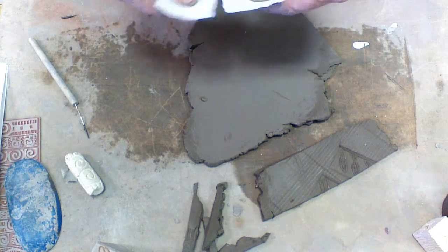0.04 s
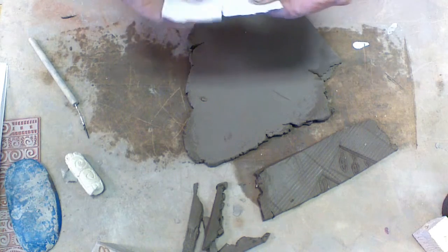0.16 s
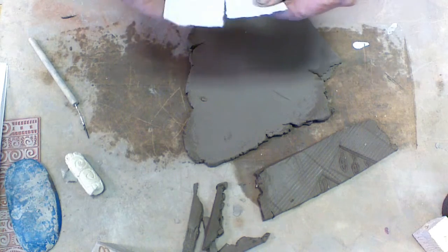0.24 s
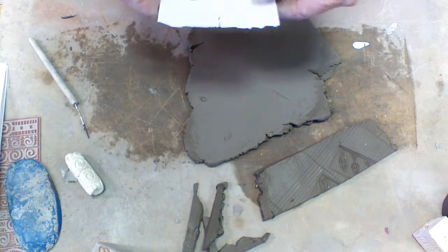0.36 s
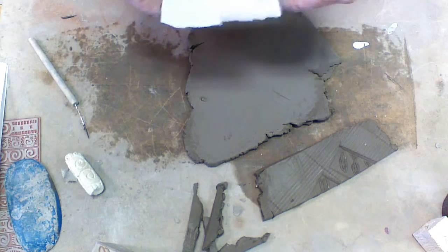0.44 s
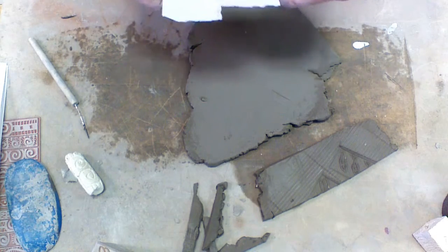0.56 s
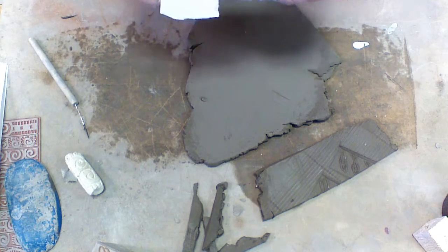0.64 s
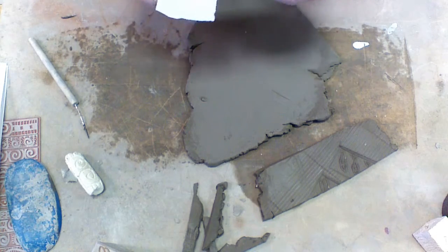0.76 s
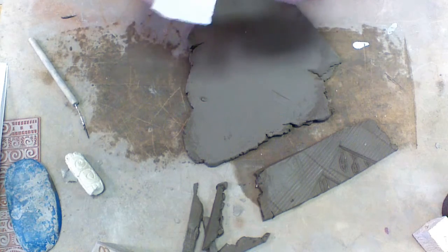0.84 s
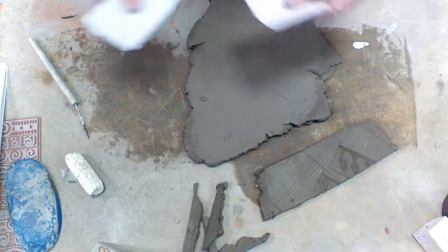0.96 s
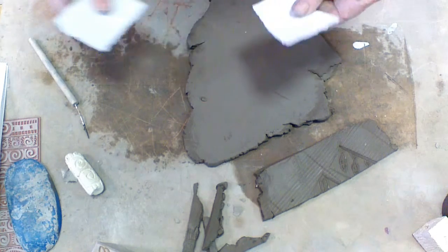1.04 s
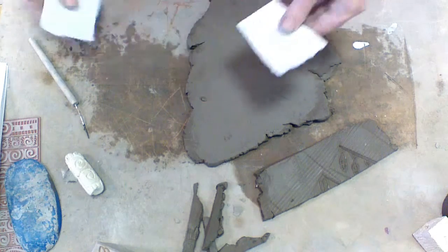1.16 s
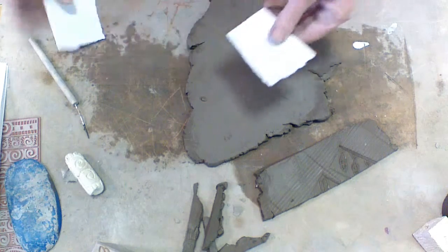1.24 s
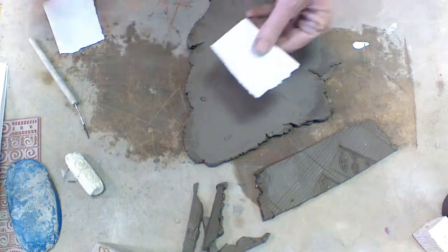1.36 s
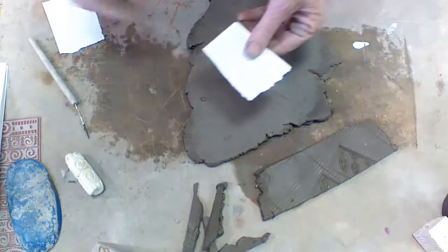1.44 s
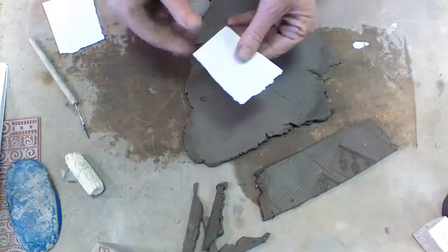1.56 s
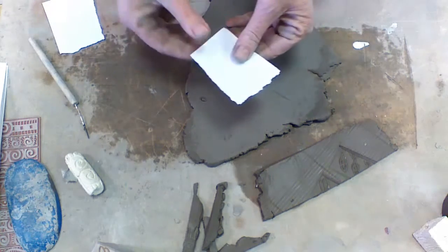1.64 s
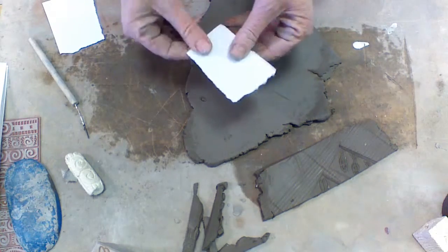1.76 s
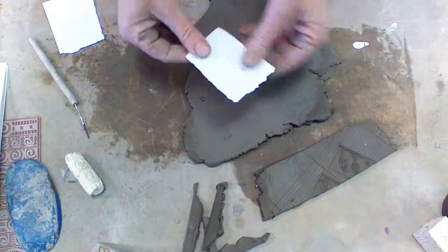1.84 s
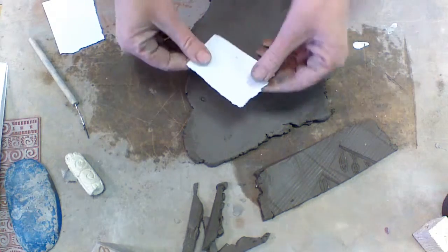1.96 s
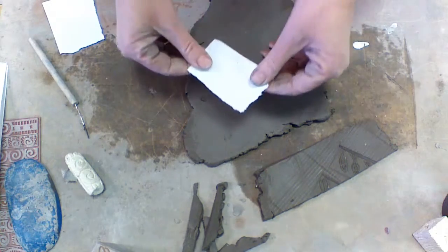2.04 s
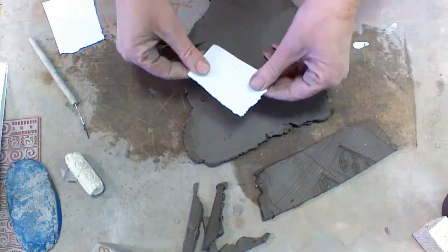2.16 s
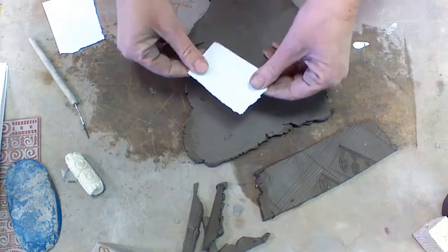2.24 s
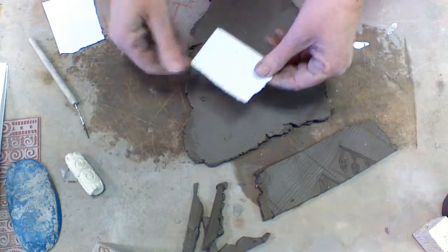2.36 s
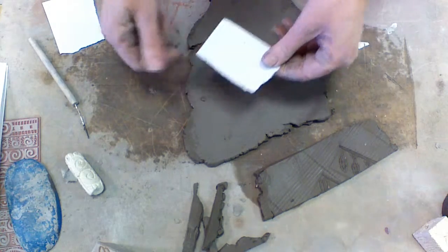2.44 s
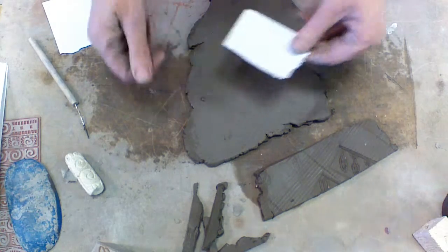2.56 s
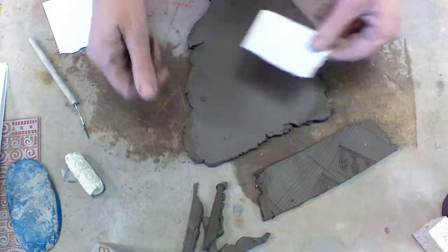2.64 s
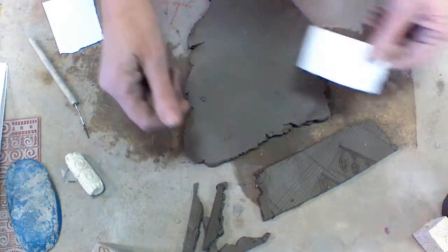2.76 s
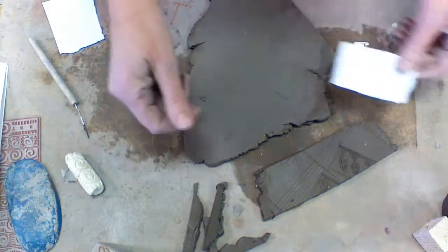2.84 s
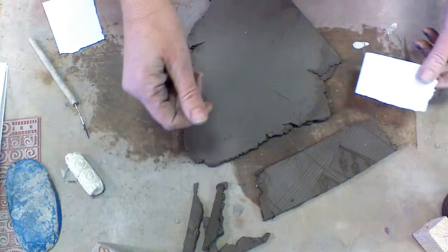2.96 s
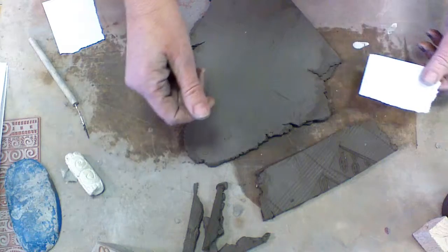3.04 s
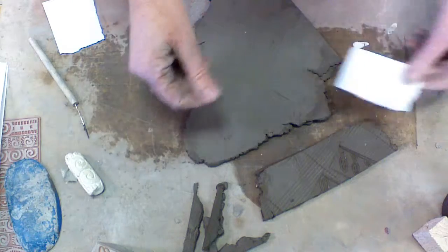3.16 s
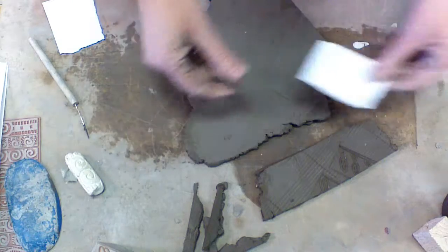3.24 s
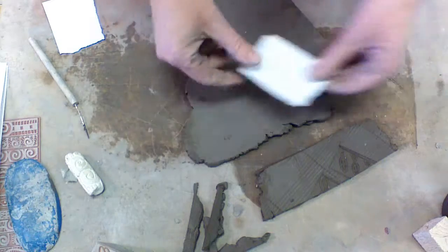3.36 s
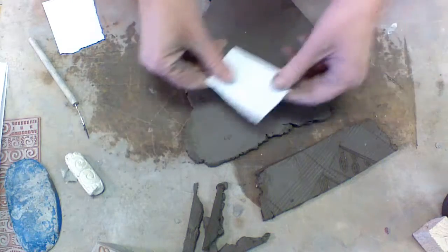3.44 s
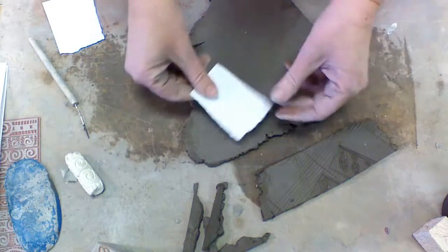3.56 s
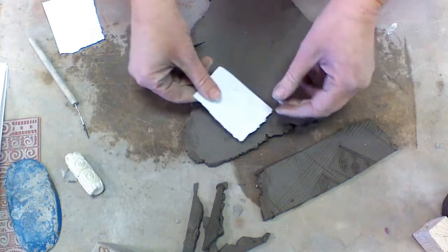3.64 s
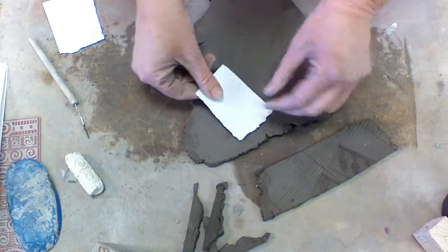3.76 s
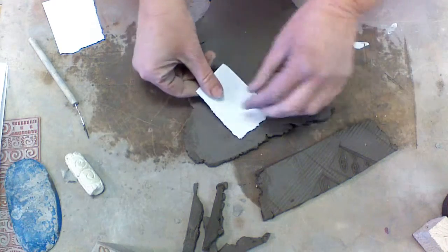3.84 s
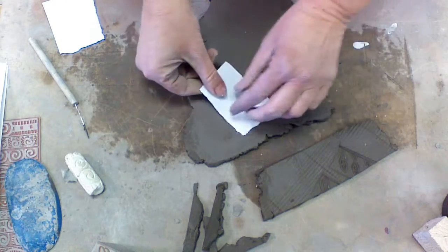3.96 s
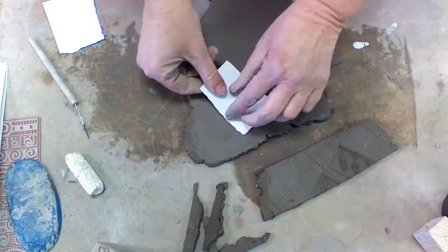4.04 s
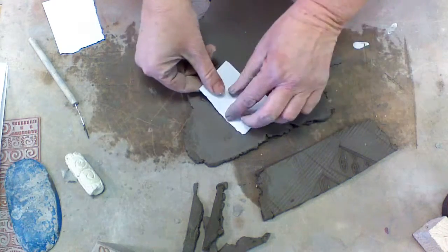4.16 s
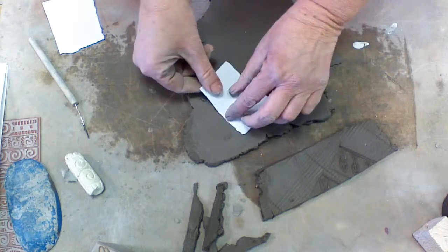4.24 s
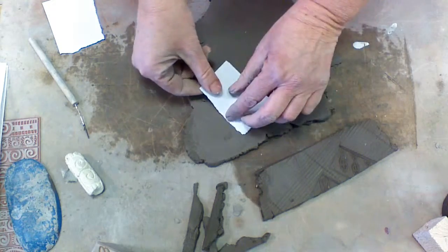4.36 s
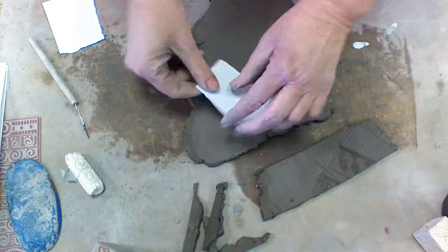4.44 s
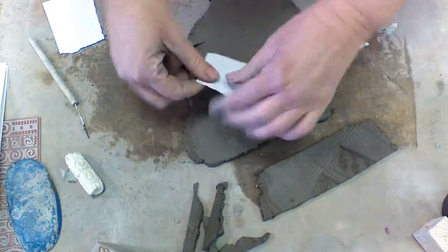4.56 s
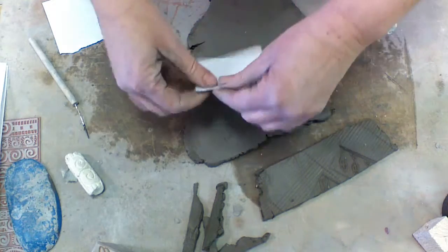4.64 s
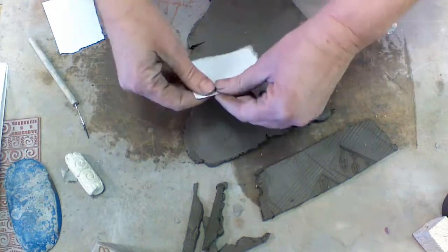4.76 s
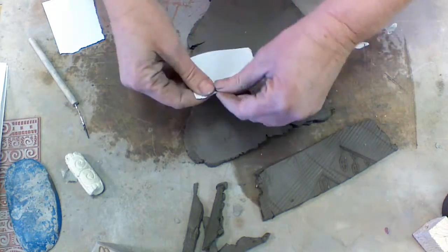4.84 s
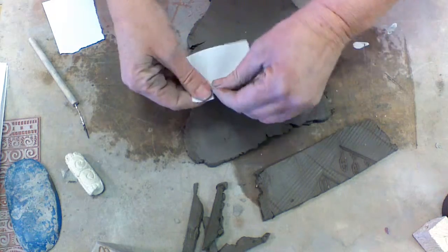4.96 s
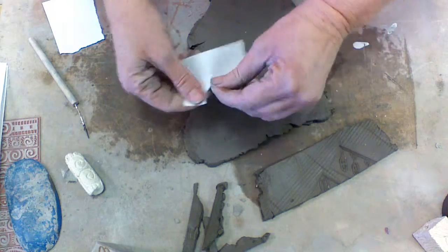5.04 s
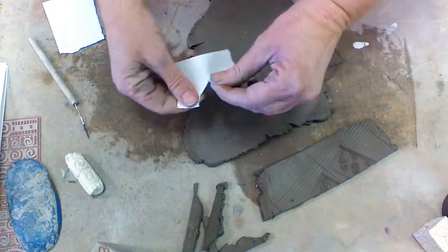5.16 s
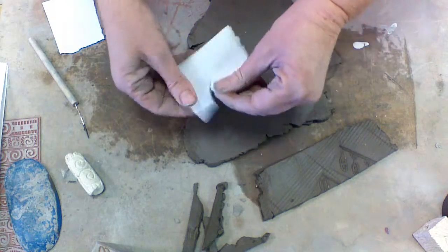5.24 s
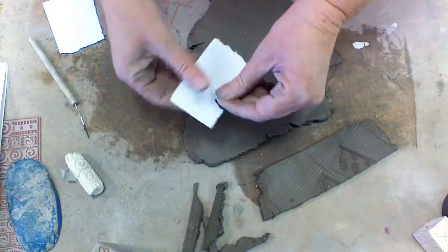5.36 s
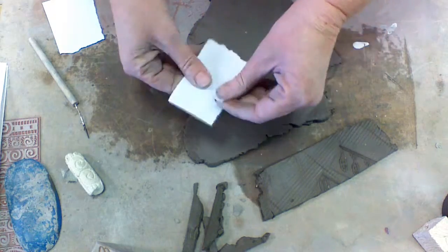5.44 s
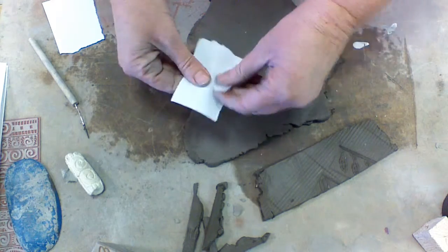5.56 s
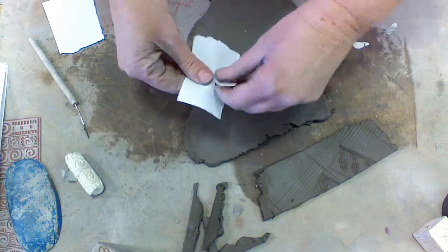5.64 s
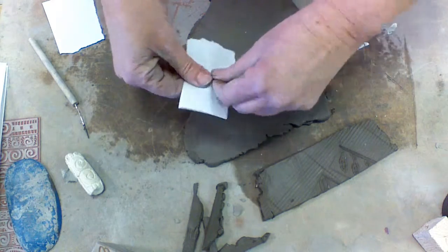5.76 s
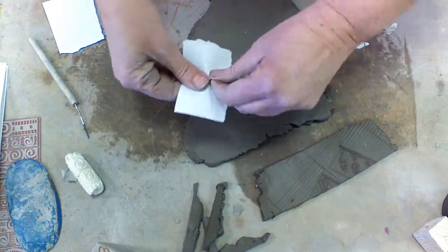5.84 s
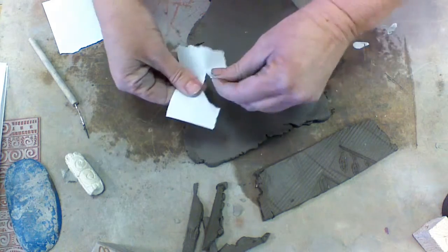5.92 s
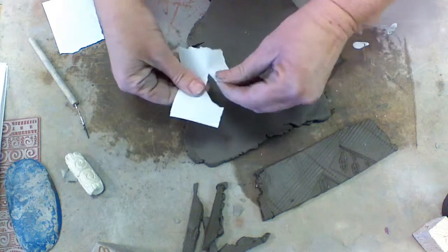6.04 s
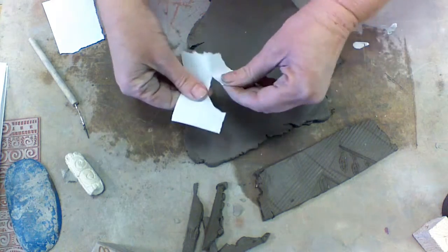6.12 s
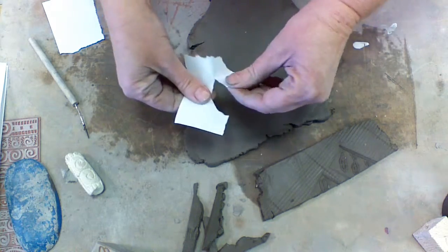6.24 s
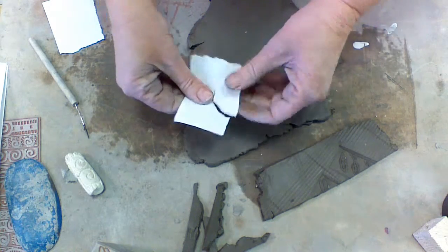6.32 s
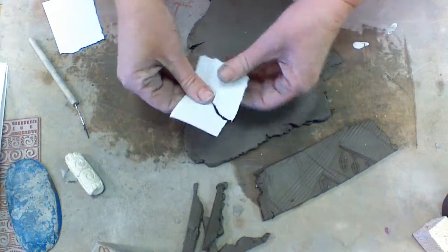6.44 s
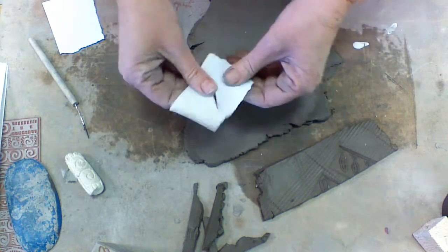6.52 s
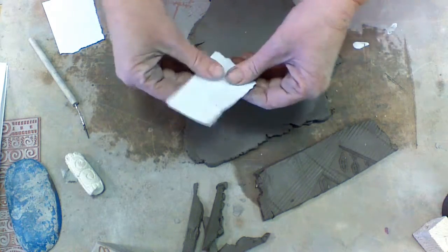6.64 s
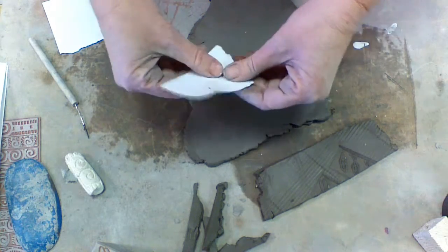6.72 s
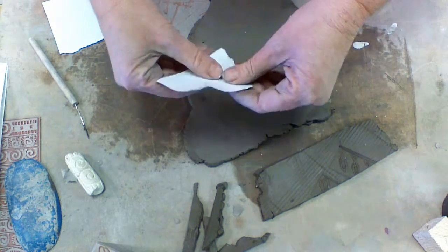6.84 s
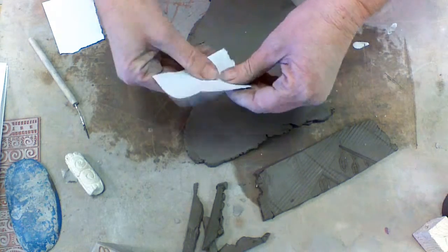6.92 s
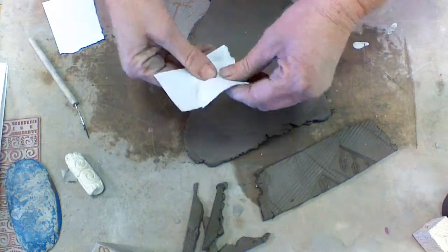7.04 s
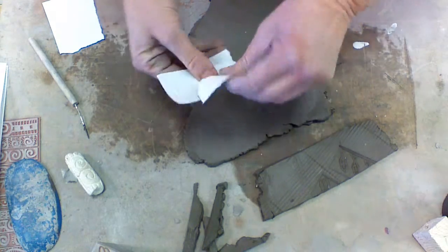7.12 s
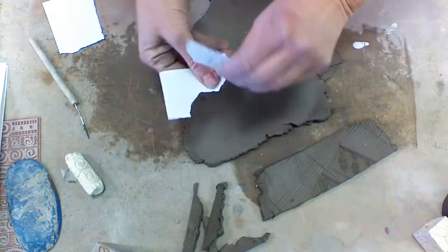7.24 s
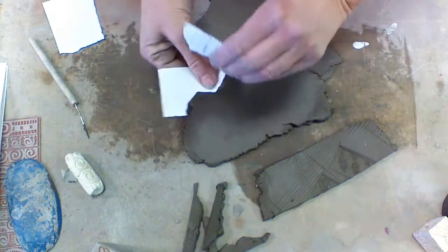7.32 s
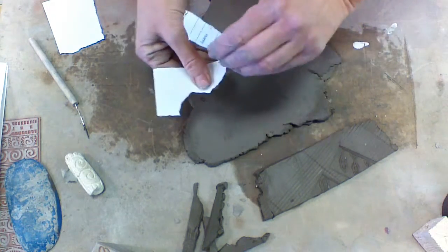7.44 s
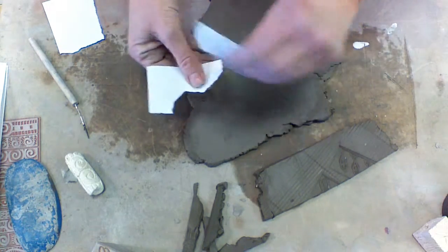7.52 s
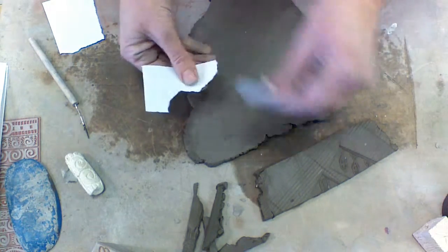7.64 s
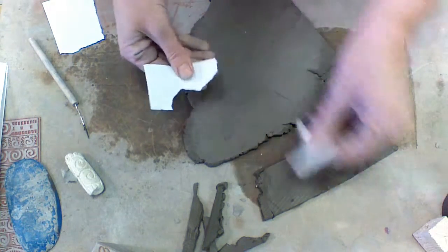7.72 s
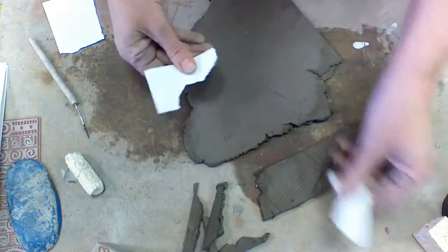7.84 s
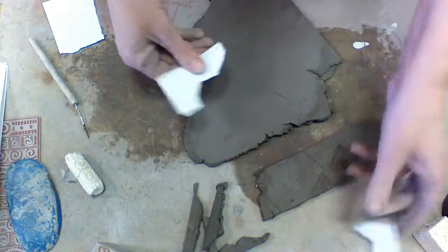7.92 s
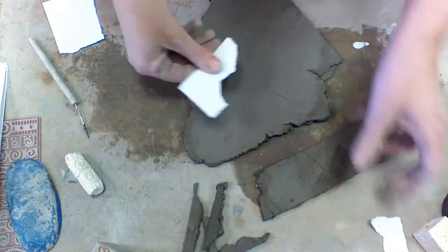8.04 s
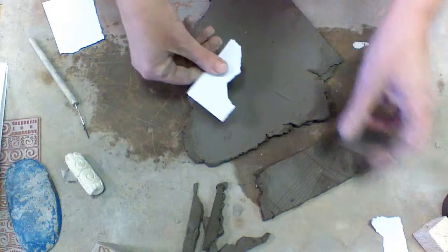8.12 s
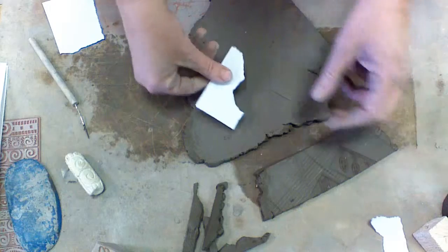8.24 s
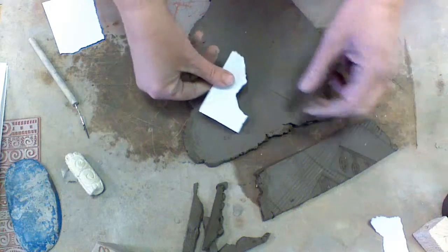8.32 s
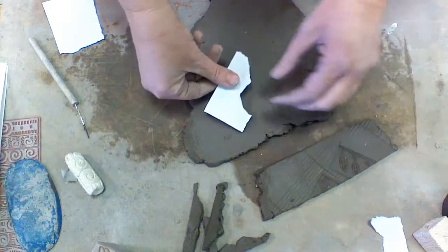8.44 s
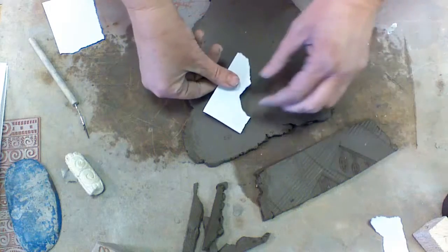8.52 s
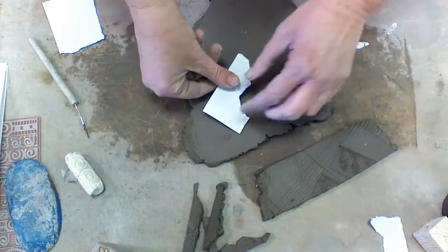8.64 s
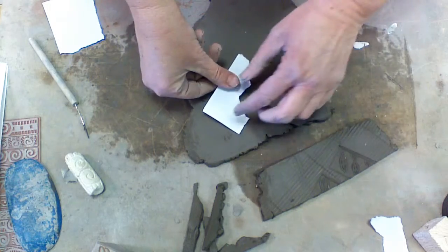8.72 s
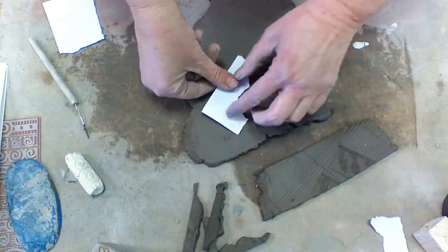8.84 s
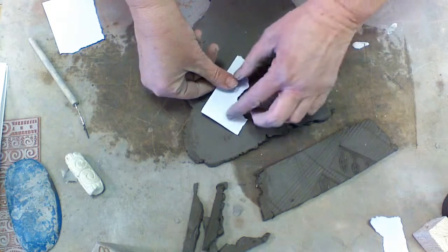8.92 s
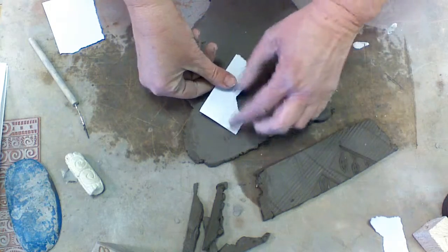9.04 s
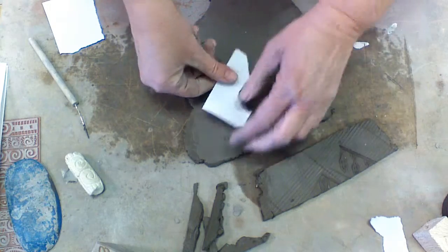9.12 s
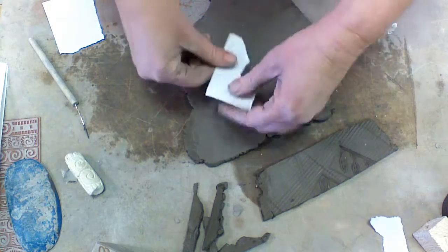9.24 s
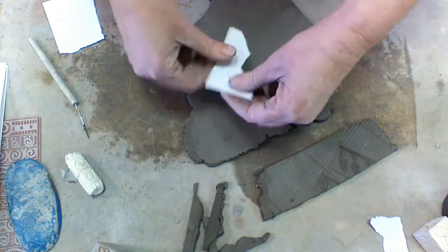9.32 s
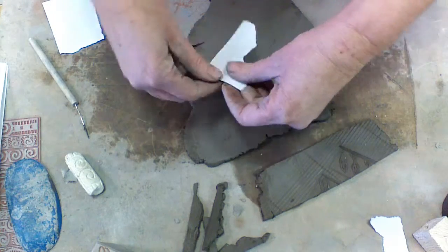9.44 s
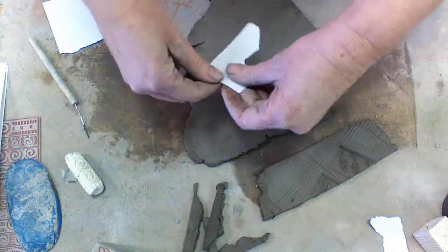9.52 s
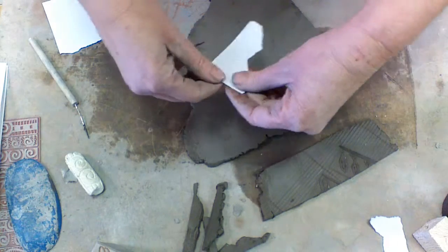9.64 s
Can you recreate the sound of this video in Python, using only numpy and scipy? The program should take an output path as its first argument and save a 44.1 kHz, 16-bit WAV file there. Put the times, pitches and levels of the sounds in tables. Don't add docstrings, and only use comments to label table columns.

```python
import sys
import numpy as np
from scipy import signal
from scipy.fft import rfft, irfft, next_fast_len
from scipy.io import wavfile
from scipy.ndimage import uniform_filter1d

SR = 44100
rng = np.random.default_rng(int(sys.argv[2]) if len(sys.argv) > 2 else 0)


def decibels_to_gain(level_db):
    exponent = np.asarray(level_db, float) / 20
    return 10 ** exponent


def int16_out(signal):
    q = np.round(np.clip(np.atleast_2d(signal).T, -1, 1) * 32767)
    wavfile.write(sys.argv[1], SR, q.astype(np.int16))


N = 426888


def rms_one(x):
    return x / np.sqrt(np.mean(x ** 2) + 1e-20)


def at_hz(points, hz):
    points_hz, values = np.array(points).T
    return np.interp(np.log(hz), np.log(points_hz), values)


# frequency in Hz, relative density in dB per Hz.
RUMBLE = [(8.2, -47), (14, -3), (64, -4.5), (77, -11), (86, -15), (124, -14), (185, -19), (227, -21),
          (332, -31), (416, -29.5), (509, -34), (1340, -42.5), (3000, -51), (3900, -89), (6600, -120)]
# centre in Hz, width in Hz, level in dB rms.
HUM = [(31.7, 16.4, -36.5), (59.36, 3.3, -41.5), (117.5, 7.8, -47.5), (155.2, 9.5, -55), (186.3, 3.4, -61),
       (229.5, 8.1, -57.5), (350, 2.3, -70.5)]
# frequency in Hz, left-right correlation from -1 to 1.
LIKENESS = [(60, 0.98), (150, 1), (380, 0.86), (950, 0.35), (2380, -0.21), (5980, -0.8), (15000, -0.19)]


def fan():
    hz = np.maximum(np.arange(N // 2 + 1) * SR / N, 1)
    rumble_db = -36.5
    broad = decibels_to_gain(at_hz(RUMBLE, hz)) ** 2 * (hz > 12) * (hz < 3000)
    power = decibels_to_gain(rumble_db) ** 2 * broad / broad.sum()
    for centre_hz, width_hz, db in HUM:
        shape = 1 / (1 + (2 * (hz - centre_hz) / width_hz) ** 4)
        power = power + decibels_to_gain(db) ** 2 * shape / shape.sum()
    alike = np.clip(at_hz(LIKENESS, hz), -1, 1)
    mid, side = rfft(rng.standard_normal((2, N)))
    both = np.sqrt(1 + alike) * mid + np.sqrt(1 - alike) * side * [[1], [-1]]
    return irfft(np.sqrt(power * N / 4) * both, N)


# frequency in Hz, density in dB per Hz.
HISS = [
    [(1500, -105), (3000, -101), (5000, -100), (6000, -95.5), (6800, -90.5), (8300, -93.5), (9000, -99),
     (11000, -103), (15500, -99)],
    [(1500, -105), (3000, -101), (5000, -99), (6000, -99), (6700, -100.5), (7800, -99), (10500, -103),
     (13000, -99.5), (15300, -92.5)],
]


def hiss():
    hz = np.maximum(np.arange(N // 2 + 1) * SR / N, 1)
    left, right = rfft(rng.standard_normal((2, N)))
    gains = [decibels_to_gain(at_hz(points, hz)) * np.sqrt(SR / 2) * (hz > 900) for points in HISS]
    return irfft(gains * np.array([left, 0.97 * right - 0.2 * left]), N)


def stroke_gains(rows, fine_db, drum_db, rattle_db):
    attack_db_per_s, release_db_per_s = 4000, 2200
    flutter_db, flutter_db_per_s, flutter_dull_db = -23.5, 89, -15
    rattle_follows_fine = 0.67
    gains, t = np.zeros((4, N)), np.arange(N) / SR
    dull = np.array([[0], [flutter_dull_db], [0], [0]])
    for s, length, start_db, end_db, extra_db in rows:
        near = slice(max(round((s - 0.1) * SR), 0), round((s + length + 0.5) * SR))
        before = np.maximum(s - t[near], 0)
        after = np.maximum(t[near] - s - length, 0)
        flutter = flutter_db - flutter_db_per_s * after + dull
        release = np.maximum(-release_db_per_s * after, flutter)
        db = np.interp(t[near], [s, s + length], [start_db, end_db])
        db = db - attack_db_per_s * before + release
        colour = np.array([0, fine_db + extra_db, drum_db, rattle_db + rattle_follows_fine * extra_db])
        gains[:, near] = np.maximum(gains[:, near], decibels_to_gain(db + colour[:, None]))
    return gains


# start in seconds, length in seconds, crackle at start in dB,
# crackle at end in dB, extra fine hiss in dB.
TEARS = [(0, 0.0085, -22, -46, 1), (.255, 0.03, -32, -38, -12), (.842, 0.045, -35, -19, 1.5),
         (4.925, 0.046, -21.5, -45.5, -7), (4.975, 0.05, -38, -35, 2), (5.027, 0.061, -30.5, -26.5, 3),
         (5.088, 0.024, -25.5, -28.5, 4), (5.119, .034, -28, -31, 5), (5.152, 0.022, -32, -28, -2),
         (5.25, 0.057, -39, -38.5, -1), (5.717, 0.024, -43, -34.5, -7), (5.765, 0.032, -37.5, -44, -4),
         (5.861, 0.052, -40.5, -26.5, -6), (5.905, 0.042, -27.5, -25.5, 1.5), (5.945, .02, -29, -35.5, 4),
         (6.211, 0.008, -46, -42, 0), (6.22, 0.0069, -29.5, -42, 3), (6.28, 0.052, -63, -37.5, -2),
         (7.079, 0.02, -43, -40.5, 12.5), (7.124, .014, -34, -38, 6.5), (7.144, 0.028, -37, -33, 9),
         (7.179, .027, -26, -22, 0), (7.207, 0.027, -20, -32.5, -3), (7.242, 0.093, -37, -41.5, 1),
         (7.351, 0.035, -36.5, -33.5, 1)]


def tears():
    return stroke_gains(TEARS, fine_db=-2.5, drum_db=-17.5, rattle_db=-13.5)


# start in seconds, length in seconds, crackle at start in dB,
# crackle at end in dB.
BENDS = [(0.01, 0.09, -42.5, -54), (0.284, 0.06, -48.5, -47), (0.349, 0.12, -59, -46),
         (0.474, 0.13, -61, -49), (1.066, 0.11, -57, -53), (1.73, 0.11, -68, -52),
         (2.049, 0.029, -48.5, -55), (2.073, 0.12, -65, -49.5), (2.281, 0.058, -48, -49.5),
         (3.399, 0.062, -52, -61), (3.467, 0.03, -68, -38), (3.533, 0.033, -49, -44.5),
         (4.614, .055, -56, -56), (4.661, 0.047, -41, -50), (5.194, 0.042, -46, -47),
         (5.303, 0.015, -51, -43), (5.366, 0.077, -52, -50.5), (5.453, 0.078, -56, -42),
         (5.537, .036, -43, -49), (5.566, 0.042, -35, -40), (5.607, 0.12, -44.5, -50.5),
         (5.807, .058, -41, -48), (6.325, 0.057, -45, -63), (6.482, 0.029, -59, -38.5),
         (6.517, 0.071, -53, -41), (6.601, 0.084, -37, -49.5), (6.682, 0.043, -40, -49),
         (6.951, 0.093, -45.5, -68), (9.263, 0.041, -60, -43), (9.477, 0.036, -55, -50)]


def bends():
    return stroke_gains([(*row, 0) for row in BENDS], fine_db=-8, drum_db=-9.5, rattle_db=-12.5)


# start in seconds, length in seconds, crackle at start in dB,
# crackle at end in dB.
SLIDES = [(0.093, 0.07, -43.5, -53.5), (0.173, 0.074, -46.5, -54), (0.594, 0.034, -45, -54),
          (1.152, .073, -47, -64), (2.15, .15, -53, -60), (4.113, 0.34, -45.5, -69.5),
          (4.703, 0.067, -63, -44), (4.771, 0.048, -46.5, -58), (6.153, .054, -64, -51),
          (6.729, 0.12, -47, -58), (6.85, 0.14, -54, -50.5), (7.578, 0.11, -72, -48.5),
          (7.689, 0.086, -48.5, -65), (7.777, 0.064, -75, -40), (7.847, 0.048, -41.5, -54),
          (7.919, 0.042, -54, -46), (7.967, 0.072, -42, -68), (8.035, 0.071, -59, -47.5),
          (8.092, .046, -54, -67), (9.314, 0.068, -39.5, -57.5), (9.524, .064, -69, -49),
          (9.586, 0.11, -47.5, -54)]


def slides():
    return stroke_gains([(*row, 0) for row in SLIDES], fine_db=-6, drum_db=-15.5, rattle_db=-16.5)


def strokes():
    gains = np.maximum(np.maximum(tears(), bends()), slides())
    return uniform_filter1d(gains, size=110)


def drift(rate_hz):
    r = np.exp(-2 * np.pi * rate_hz / SR)
    return rms_one(signal.lfilter([1], [1, -2 * r, r * r], rng.standard_normal(N)))


def fibres(clump):
    fibres_per_s, spread_db = 4500, 2
    sizes = decibels_to_gain(spread_db * np.minimum(rng.exponential(1, N), 5)) * rng.choice([-1, 1], N)
    parting = rng.random(N) < fibres_per_s * clump / SR
    return rms_one(sizes * clump * parting + 1e-9)


def two_paths(shared, own, alike):
    alike = np.clip(alike, 0, 1)
    common = np.array([np.roll(shared, shift=1), shared])
    return np.sqrt(alike) * common + np.sqrt(1 - alike) * own


CRACKLE_HZ, FINE_HZ = (4300, 9600), (9000, 16500)


def band(x, lo_hz, hi_hz):
    return signal.sosfilt(signal.butter(2, [lo_hz, hi_hz], "band", fs=SR, output="sos"), x)


def resonance(x, hz, width_hz):
    r = np.exp(-np.pi * width_hz / SR)
    top = np.array([1, 0, -1]) * (1 - r * r) / 2
    return signal.lfilter(top, [1, -2 * r * np.cos(2 * np.pi * hz / SR), r * r], x)


# frequency in Hz, width in Hz, dB over the flat response.
PORTS = [
    [(6800, 1460, 8), (7950, 6600, 1), (18000, 2000, 11.5)],
    [(6506, 330, 15.5), (3960, 1000, -4.5), (17200, 910, 14)],
]


def port(x):
    heard = []
    for side, table in zip(x, PORTS):
        boosts = [(decibels_to_gain(db) - 1) * resonance(side, hz, width_hz) for hz, width_hz, db in table]
        heard.append(side + sum(boosts))
    return np.array(heard)


def modes(x, table):
    return sum((-1) ** k * decibels_to_gain(db) * resonance(x, hz, width_hz)
               for k, (hz, width_hz, db) in enumerate(table))


# frequency in Hz, width in Hz, level in dB.
SHEET = [(1010, 550, -1), (1296, 206, 7), (1720, 950, -4)]


def drumming(x):
    return modes(x, SHEET)


# frequency in Hz, width in Hz, level in dB.
RATTLE = [(2885, 840, 0.5), (3390, 410, 5.5), (4140, 1140, 2.5)]


def rattling(x):
    return modes(x, RATTLE)


def rips():
    crackle_gain, fine_gain, drum_gain, rattle_gain = strokes()
    clump_db = 2
    clump = decibels_to_gain(clump_db * (drift(90) + 0.7 * drift(250)))
    shared, own = fibres(clump), np.array([fibres(clump), fibres(clump)])
    crackle = port(band(two_paths(shared, own, 0.14), *CRACKLE_HZ))
    opposed = two_paths(-shared, own, 0.36) * [[1], [-1]]
    fine = port(band(opposed, *FINE_HZ))
    near = two_paths(shared, own, 0.96)
    out = crackle_gain * rms_one(crackle)
    for layer, gain in ((fine, fine_gain), (drumming(near), drum_gain), (rattling(near), rattle_gain)):
        out = out + gain * decibels_to_gain(2.4 * drift(23)) * rms_one(layer)
    return out


def workshop(x):
    t60_s, wall_cut_hz = 0.7, 3700
    size = next_fast_len(N + SR)
    hz = np.arange(size // 2 + 1) * SR / size
    dull = 1 / (1 + 1j * hz / wall_cut_hz) ** 1.7
    response = np.zeros((2, len(hz)), complex)
    for k, lag_s in enumerate(rng.uniform(0.008, 0.05, 16)):
        loop = decibels_to_gain(-60 * lag_s / t60_s) * dull * np.exp(-2j * np.pi * hz * lag_s)
        response[k % 2] += (-1) ** (k // 2) * loop / (1 - loop)
    return irfft(rfft(x, size) * response, size)[:, :N]


def snaps(rows):
    crack, drum, rattle = np.zeros((3, 2, N + 1000))
    t = np.arange(1000) / SR
    swell = 2.25 * (t / 0.00092) * np.exp(-t / 0.00081)
    noise = rng.standard_normal((len(rows), 3, 1000))
    for (s, db, drum_db, rattle_db), (shared, *own) in zip(rows, noise):
        i = round((s - 0.0003) * SR)
        burst = decibels_to_gain(db) * swell
        crack[:, i:i + 1000] += decibels_to_gain(-6) * burst * two_paths(shared, np.array(own), 0.48)
        near = burst * two_paths(shared, np.array(own), 0.99)
        drum[:, i:i + 1000] += decibels_to_gain(drum_db + 14) * near
        rattle[:, i:i + 1000] += decibels_to_gain(rattle_db + 6) * near
    crack = port(band(crack, *CRACKLE_HZ) + decibels_to_gain(-8) * band(crack, *FINE_HZ))
    return (crack + drumming(drum + 1e-18) + rattling(rattle + 1e-18))[:, :N]


# time in seconds, peak in dB, drumming in dB re peak, rattle in dB re peak.
CREASES = [(0.0293, -35, 3, 4), (0.2598, -13, -26, -7), (0.4654, -25, -6.5, -8), (1.732, -31, -7.5, -10),
           (1.75, -28.5, -5.5, -3), (2.0427, -36, -7.5, -27), (3.4433, -37, -5.5, -3),
           (4.6564, -29, -11, -34), (5.1655, -13, -23, -21), (5.252, -26, -14, -30),
           (5.318, -18, -17, -17.5), (5.373, -30, -7, -11), (5.3953, -16, -19, -9), (5.497, -46.5, 10, 3),
           (5.5338, -3.5, -17.5, -10.5), (3.563, -35, -8, -5), (7.367, -30, -5, -16),
           (6.3376, -15, -16.5, -13.5), (6.5048, -29, -16, -18), (6.55, -22.5, -15, -17),
           (6.6116, -17.5, -21, -17), (6.6811, -24.5, -7, -22), (6.989, -32.5, -7.5, -6),
           (7.1975, -6.5, -18, -22), (7.3908, -16.5, -14, -31), (9.2939, -27, -9, -35),
           (9.4825, -39, -6, -22)]


def creases():
    return snaps(CREASES)


# time in seconds, peak in dB, note in Hz.
KNOCKS = [(0.033, -33, 1113), (0.262, -27, 960), (0.465, -21, 1050), (0.893, -21.5, 960),
          (1.754, -24.5, 1315), (2.044, -40, 1800), (5.254, -28, 980), (5.317, -24, 1270),
          (5.396, -30, 1300), (5.533, -17, 1680), (6.338, -28, 1110), (6.615, -29, 982), (6.68, -25, 1120),
          (6.988, -29, 1100), (7.2, -20, 1305), (7.391, -36, 1230), (9.297, -33, 1070)]


def knocks():
    t60_s, rise_s, level_db = 0.022, 0.001, -2
    out, t = np.zeros(N + 3000), np.arange(3000) / SR
    for s, db, hz in KNOCKS:
        i = round(s * SR)
        decay = decibels_to_gain(db + level_db - 60 * t / t60_s)
        out[i:i + 3000] += decay * (1 - np.exp(-t / rise_s)) * np.sin(2 * np.pi * hz * t)
    return out[:N]


# time in seconds, peak in dB.
TICKS = [(0.1215, -30), (0.19, -31), (0.2331, -37.0), (0.247, -21), (0.2821, -32), (0.3339, -26),
         (0.4235, -32), (0.4441, -36), (0.4717, -23), (0.8054, -37), (1.2904, -34), (1.7428, -27),
         (1.7554, -32), (2.0485, -34.0), (3.4994, -31.0), (4.1005, -30), (4.4227, -34), (5.2571, -27.0),
         (5.2618, -27.0), (5.2745, -27), (5.2871, -29.0), (5.3039, -24), (5.3228, -30), (5.3637, -34),
         (5.421, -23.5), (5.7344, -21), (5.779, -21), (5.7925, -30.0), (5.835, -32.0), (5.8508, -30.0),
         (6.057, -33), (6.0692, -33), (6.1472, -17), (6.1572, -35.0), (6.1762, -37.0), (6.188, -27),
         (6.2583, -36), (6.3213, -30.0), (6.3273, -35), (6.5113, -24), (6.518, -31), (6.6561, -28),
         (6.6877, -28), (6.7034, -29.0), (6.875, -25.5), (6.931, -35), (7.8445, -37), (7.9324, -34),
         (7.958, -30.0), (7.9697, -36), (8.0677, -41), (8.0806, -30), (8.0856, -32.0), (8.9503, -35.5),
         (9.265, -31.5), (9.2768, -37.0), (9.3233, -31), (9.331, -35), (9.347, -30.5), (9.6404, -29.0)]


def ticks():
    drum_db, rattle_db = -28, -17.5
    return snaps([(s, db, drum_db, rattle_db) for s, db in TICKS])


# time in seconds, peak in dB, rattle in dB re peak.
BUNDLES = [(0.841, -20.0, -26), (0.8735, -4, -29), (0.8807, -7.0, -28), (0.889, -2.5, -23),
           (0.8944, -2.5, -11), (4.9233, -10.0, -18), (4.933, -19, -30.0), (4.9488, -17.0, -24.0),
           (4.9537, -23, -25), (4.9637, -13.5, -28.0), (4.9782, -19, -25), (4.9819, -21.0, -23),
           (5.009, -11.5, -28), (5.0161, -10.5, -26.0), (5.0385, -8, -27), (5.0631, -13, -31),
           (5.0764, -7.0, -26.0), (5.085, -7, -24), (5.0947, -14, -13), (5.1078, -10, -7.5),
           (5.1212, -9.0, -16), (5.1342, -1, -14.0), (5.1406, -8, -20.0), (5.1463, -14.0, -19.0),
           (5.1494, -19, -17.0), (5.1847, -27.0, -17.0), (5.8651, -27, -19), (5.886, -18.0, -28),
           (5.899, -12, -25), (5.9085, -13.0, -27.0), (5.9181, -8.5, -22.0), (5.9335, -10, -17.0),
           (5.9423, -12, -21.0), (5.948, -16, -10), (6.1998, -19.0, -23.0), (6.2101, -11.0, -23),
           (6.2157, -21, -27), (6.2226, -21, -20), (6.227, -11, -23), (7.0632, -34, -22.0),
           (7.0732, -33, -27.0), (7.0838, -30, -27.0), (7.097, -22, -14), (7.1446, -16.5, -29.0),
           (7.1627, -20, -22.0), (7.1662, -17.0, -25.0), (7.1805, -14.0, -23.0), (7.1835, -14.0, -27.0),
           (7.1917, 1.5, -22.0), (7.2124, -11.0, -22.0), (7.218, -8, -25.0), (7.225, -16.0, -19.0),
           (7.2407, -22.0, -17.0), (7.261, -21.0, -21.0), (7.2731, -23.0, -16.0), (7.2894, -20, -14),
           (7.3119, -20, -15), (7.3351, -27.0, -24.0), (7.3524, -19.0, -27.0), (7.357, -21.0, -24.0)]


def bundles():
    drum_db = -32
    return snaps([(s, db, drum_db, rattle_db) for s, db, rattle_db in BUNDLES])


# start in seconds, length in seconds,
# level in dB rms, first note in Hz, last note in Hz.
FLAPS = [(2.15, 0.11, -53, 6000, 6400), (3.8, 0.25, -58.5, 5200, 6200), (5.064, 0.097, -52, 1200, 1300),
         (5.028, 0.095, -28.5, 8000, 7300), (5.87, 0.062, -36, 5800, 5000), (5.895, 0.048, -40, 900, 1590),
         (5.2, 0.18, -48, 7700, 7800), (7.22, .17, -43.5, 6300, 7900), (7.822, 0.066, -47.5, 7600, 7200),
         (7.928, 0.062, -48, 6200, 5600), (9.269, 0.037, -49, 6000, 6600), (3.475, 0.047, -50, 6500, 6300),
         (5.93, .035, -39, 3400, 3600), (1.81, 0.051, -57.5, 4200, 3400)]


def flaps():
    relative_width = 0.089
    out = np.zeros((2, N))
    for s, length, db, first_hz, last_hz in FLAPS:
        i, size = round(s * SR), round(length * SR)
        pole = np.exp(-np.pi * relative_width * first_hz / SR)
        noise = rng.standard_normal((2, 2, SR // 2))
        real, imag = signal.lfilter([1], [1, -2 * pole, pole ** 2], noise)[..., -size:]
        phase = 2 * np.pi * np.cumsum(np.linspace(first_hz, last_hz, size)) / SR
        shared, other = rms_one(real * np.cos(phase) + imag * np.sin(phase))
        sides = np.array([shared, 0.75 * shared + 0.84 * other])
        out[:, i:i + size] += decibels_to_gain(db) * np.hanning(size) ** 0.5 * sides
    return out


def scene():
    room_db = -24.5
    paper = rips() + creases() + knocks() + ticks() + bundles() + flaps()
    return paper + decibels_to_gain(room_db) * workshop(paper) + fan() + hiss()


def band_limit(x):
    return signal.sosfilt(signal.butter(12, 17010, fs=SR, output="sos"), x)


def record(dry):
    rounded = 1.6 * np.tanh(dry / 1.6)
    mix = signal.sosfilt(signal.cheby2(16, 60, 16200, fs=SR, output="sos"), rounded)
    return band_limit(mix)


dry = scene()
out = record(dry)
int16_out(out)
```